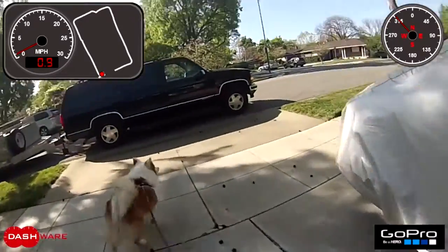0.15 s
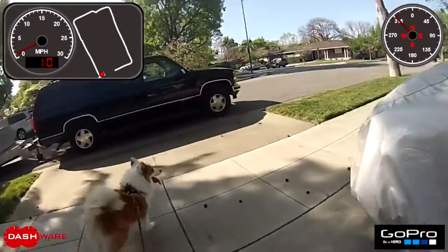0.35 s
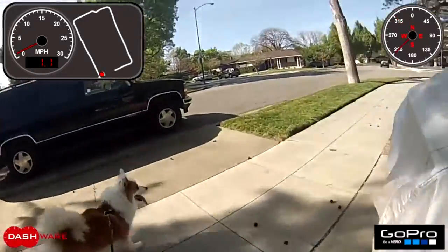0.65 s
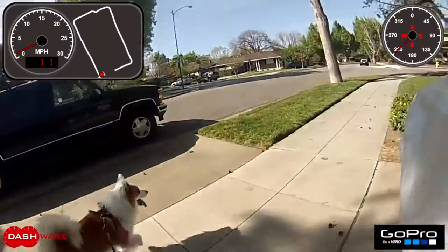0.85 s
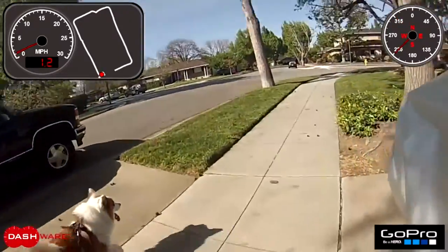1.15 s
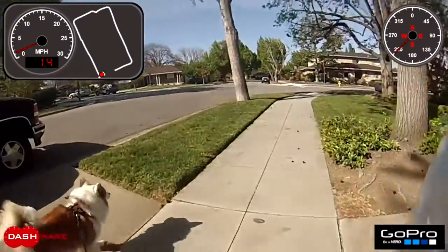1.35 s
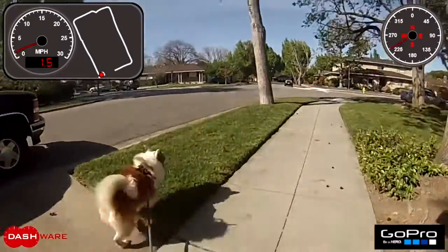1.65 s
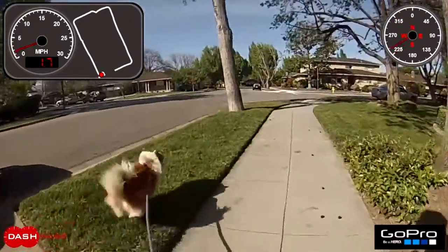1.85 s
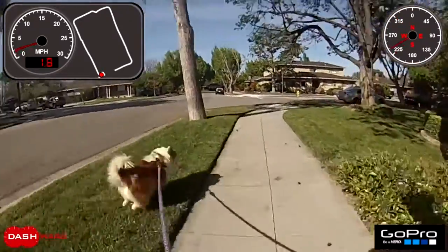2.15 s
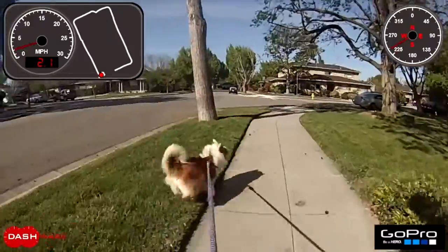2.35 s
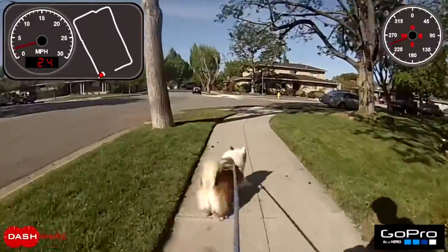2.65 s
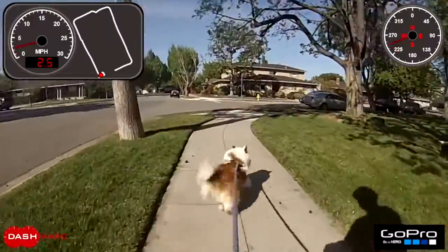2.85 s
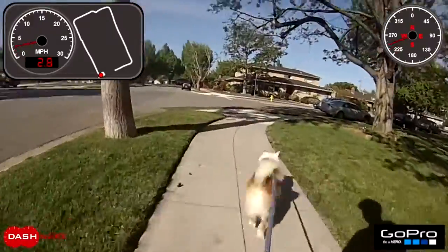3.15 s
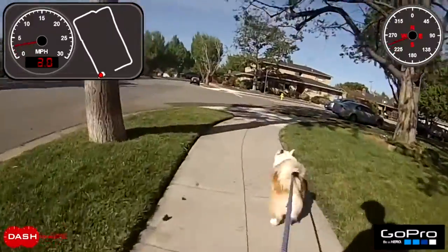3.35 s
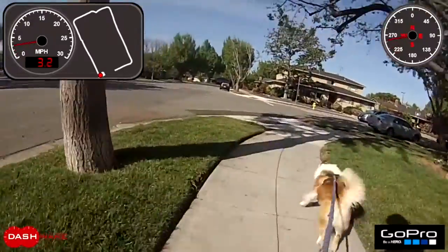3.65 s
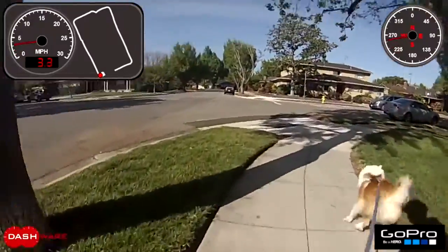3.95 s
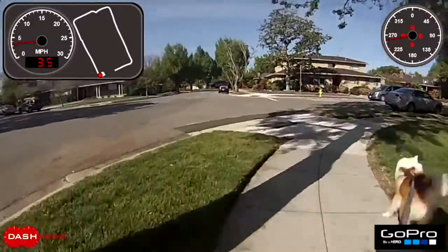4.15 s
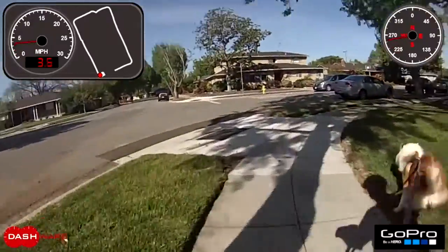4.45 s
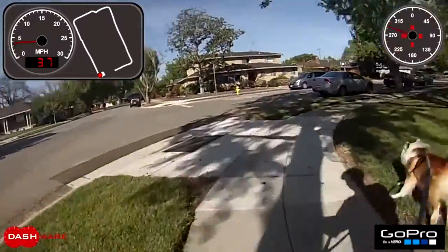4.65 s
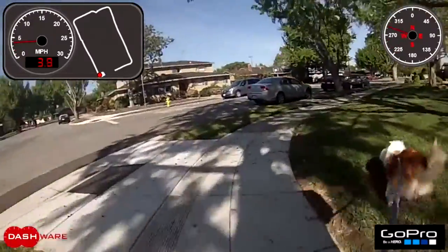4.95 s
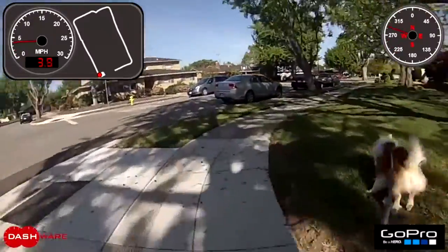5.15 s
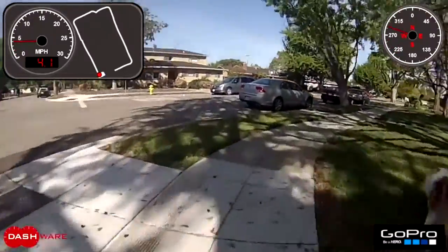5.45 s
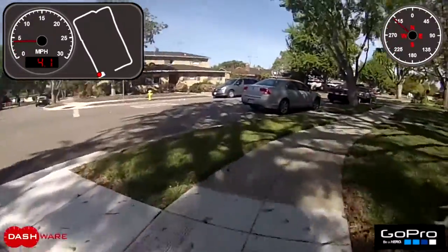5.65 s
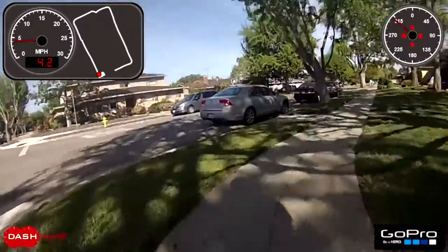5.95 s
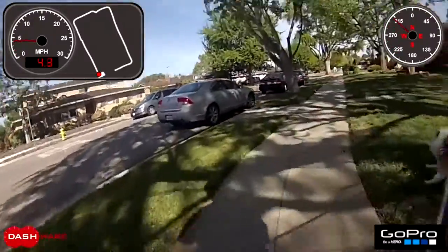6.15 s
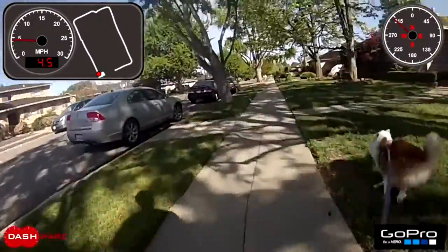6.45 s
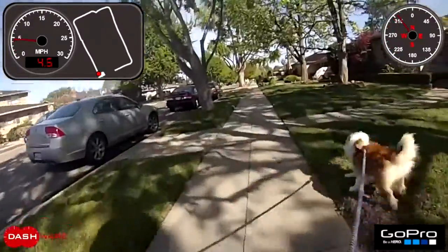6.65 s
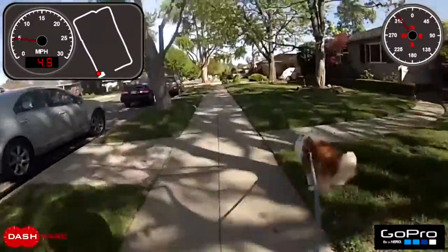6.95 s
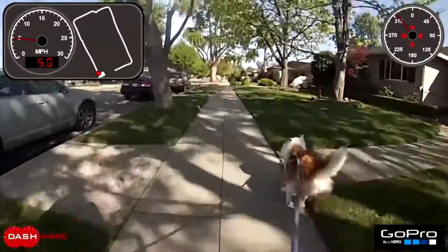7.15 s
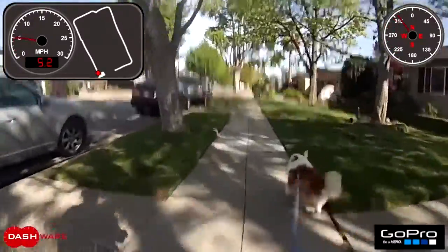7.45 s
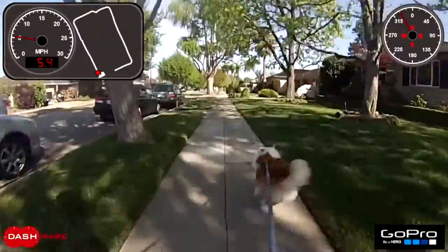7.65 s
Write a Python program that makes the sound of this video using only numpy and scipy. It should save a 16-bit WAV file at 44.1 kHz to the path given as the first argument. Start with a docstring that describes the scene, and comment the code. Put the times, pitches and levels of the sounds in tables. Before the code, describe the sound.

A continuous low boom and dull scraping hiss from scooter wheels on pavement, picked up very close through the vibrating frame. Several blunt thumps strike every second, each with plastic clicks or rattles from loose parts, and the rumble briefly drops after many of them. Fine grit ticks faintly. In the second half knocks crowd together and sound harder and snappier. Muffled, dry, with no room echo.

```python
"""Hard scooter wheels on a concrete sidewalk

Small hard wheels roll over slabs, heard by a microphone fixed to the frame in a closed housing. Random bumps
ring the resonant mount near 75 Hz; shaped swings make the jolts, and the roll dips and creeps back. Noise
bursts and damped modes make loose parts click and ring, grit tick and a small metal part chatter. The housing
muffles the treble, which ends steeply near 15.8 kHz, and the hardest jolts flatten at full scale."""
import sys
import numpy as np
from scipy import signal
from scipy.fft import rfft, irfft, next_fast_len
from scipy.io import wavfile
from scipy.ndimage import uniform_filter1d, map_coordinates

SR = 44100
rng = np.random.default_rng(int(sys.argv[2]) if len(sys.argv) > 2 else 0)


def boost(x):
    """Linear amplitude factor 10**(x/20) for a level x in decibels (scalar or array-like)."""
    u = np.asarray(x, float) / 20
    return 10 ** u


def inscribe(sig):
    """Save sig as 16-bit PCM at rate SR to the path in sys.argv[1].

    A 1-D sig is mono; a 2-D sig holds one channel per row.
    Samples are clipped to [-1, 1] before scaling.
    """
    pcm = np.round(np.clip(np.atleast_2d(sig).T, -1, 1) * 32767)
    wavfile.write(sys.argv[1], SR, pcm.astype(np.int16))


N = 343980  # samples, 7.8 s

# Spectra as relative level per Hz; response() scales each to unit energy.
# the housing, as rolling noise and blows reach the microphone: frequency_hz, level_db
HOUSING_COLOUR = [(300, -12.5), (600, -8.5), (800, -12), (960, -19.5), (1090, -5.5), (1290, -1.5),
                  (1480, -12), (1900, -21), (2600, -41), (5000, -120)]
# the upper ring of the shell: frequency_hz, level_db
SHELL_COLOUR = [(900, -60.5), (1500, 4), (1900, 0), (2400, -4), (2750, -18.5), (3300, -25), (5000, -38),
                (9000, -120)]
# thin treble that passes the housing: frequency_hz, level_db
TREBLE_COLOUR = [(1800, -80), (2800, 1.5), (3400, -2), (4100, -1.5), (5500, -6), (7500, -11), (9700, -18.5),
                 (11100, -18.5), (12600, -23.5), (15500, -26), (17000, -69.5), (20000, -120)]
# the ring of a small metal part: frequency_hz, level_db
METAL_COLOUR = [(2500, -36.5), (4200, 8), (4650, -4.5), (5050, 2), (6500, -8.5), (7500, -6.5),
                (8200, -13.5), (9100, -7.5), (10000, -23.5), (11300, -9), (12500, -16.5), (16000, -51)]
# modes that small contacts ring in the case, one at a time: pitch_hz, level_db
CASE_RESONANCES = [(1150, 0.5), (1290, 1.5), (1600, -7.5), (1900, -6), (2200, -11), (2450, -11)]
# modes that small contacts ring in the metal, one at a time: pitch_hz, level_db
METAL_RESONANCES = [(4200, -2), (5050, 1), (5700, -3), (7400, -12), (9100, -10), (11300, -13.5)]
PING_CYCLES = 36  # cycles in which a ringing part fades by 60 dB


def steady(x, span):
    """Level normalization: division by the moving rms over span seconds, with a small floor."""
    power = uniform_filter1d(x ** 2, int(span * SR))
    return x / np.sqrt(np.abs(power) + 0.0009 * np.mean(x ** 2))


def wobble(rate):
    """Band-limited fluctuation: a smooth curve through random knots, rate a second."""
    knots = rng.standard_normal(int(N * rate / SR) + 4)
    return map_coordinates(knots, [np.arange(N) * rate / SR])


def response(points, size=4096):
    """Minimum phase: the folded cepstrum of a spectrum gives its causal impulse response, of energy 1."""
    f, db = np.transpose(points)
    log_bins = np.log(np.fft.rfftfreq(size, 1 / SR) + 1)
    gain = boost(np.interp(log_bins, np.log(f + 1), db))
    cepstrum = irfft(np.log(gain + 1e-6))
    cepstrum[1:size // 2] *= 2
    cepstrum[size // 2 + 1:] = 0
    h = irfft(np.exp(rfft(cepstrum)))
    return h / np.linalg.norm(h)


def through(x, points):
    """Linear filtering: convolution with the causal response colours the source."""
    return signal.fftconvolve(x, response(points))[:N]


def grit(rate, spread_db):
    """Shot noise: random impulses, rate a second on average, a few much larger than the rest."""
    chance = rng.random(N)
    size = rng.exponential(1, N)
    sign = rng.standard_normal(N)
    return (chance < rate / SR) * sign * boost(spread_db * np.minimum(size, 5.5))


def patchy(x, depth_db):
    """Spectral variation: random gain in patches of time and pitch gives every contact its own colour."""
    z = signal.stft(x, nperseg=128)[2]
    field = uniform_filter1d(rng.standard_normal(z.shape), size=7, axis=0)
    field = uniform_filter1d(field, size=5, axis=1)
    varied = z * boost(depth_db * field / field.std())
    return signal.istft(varied, nperseg=128)[1][:N]


def bursts(events, colour, tail_db, tail_t60):
    """Transient scattering: ragged noise builds up, peaks and decays, with a faint tail on both sides."""
    lead = SR // 30
    out = np.zeros(N + SR)
    t = (np.arange(SR // 8) - lead) / SR
    noise = boost(2.5 * wobble(500)) * rng.standard_normal(N)
    ragged = steady(through(patchy(noise, depth_db=5.5), colour), span=.006)
    for s, db, t60 in events:
        span = np.where(t < 0, -t / 0.73, t)  # the build-up is shorter than the decay
        fade = boost(-60 * span / np.clip(t60, .006, .09))
        fade += boost(tail_db - 60 * span / tail_t60)
        out[round(s * SR) - lead:][:len(t)] += boost(db) * fade
    return out[:N] * ragged


def rings(s, db, modes):
    """Modal excitation: each contact rings one damped mode picked by chance, a little off pitch."""
    detune = .04  # greatest shift, as a share of the pitch
    pick, shift, size = rng.random((len(s), 3)).T
    hz, mode_db = np.array(modes)[(pick * len(modes)).astype(int)].T[:, :, None]
    shifted_hz = hz * (1 + detune * (2 * shift[:, None] - 1))
    turns = shifted_hz * np.arange(SR // 30) / SR
    level_db = (db + 5 * size)[:, None] + mode_db
    envelope = boost(level_db - 60 * turns / PING_CYCLES) * turns / (3 + turns)
    tones = envelope * np.sin(2 * np.pi * turns)
    at = (s * SR).astype(int)[:, None] + np.arange(SR // 30)
    return np.bincount(at.ravel(), tones.ravel(), N + SR)[:N]


def scattered(modes, count, spread_db):
    """Random excitation of modes: contacts at chance moments, a few much larger than the rest; rms 1."""
    s, size = rng.random((count, 2)).T
    x = rings(s * N / SR, -spread_db * np.log(size + .01), modes)
    return x / x.std()


def ticks():
    """Impact excitation: each grain flung against the metal part is a brief burst in its colour."""
    # single grains of grit: peak_s, level_db
    grains = [(0.406, -57), (.656, -55.5), (1.248, -51), (1.87, -55.5), (2.094, -57), (2.369, -54),
              (2.559, -54), (2.601, -54.5), (2.667, -51), (3.198, -55), (3.397, -55), (3.482, -54),
              (3.637, -59), (3.723, -54.5), (3.808, -55.5), (4.976, -59.5), (5.049, -56.5), (5.888, -60),
              (6.148, -54), (6.419, -55), (6.572, -60), (6.583, -59), (6.676, -53), (6.971, -57),
              (7.198, -53), (7.681, -51)]
    t60_s = 0.02
    return bursts([(s, db, t60_s) for s, db in grains], METAL_COLOUR, tail_db=-17.5, tail_t60=0.055)


def chatter():
    """Repeated impact: dense random contacts ring the small metal part for a moment."""
    # spells of chatter: start_s, length_s, level_db
    spells = [(3.535, 0.028, -61), (4.58, 0.079, -62.5), (6.022, 0.032, -63), (6.332, 0.054, -71),
              (7.098, 0.046, -52), (7.16, 0.093, -58.5)]
    t = np.arange(N) / SR
    gate = np.zeros(N)
    for s, length, db in spells:
        corners = [s - .004, s, s + length, s + length + 0.012]
        gate += boost(db) * np.interp(t, corners, [0.0045, 0.88, 0.64, 0.024])
    flutter = boost(4.6 * wobble(90))
    return gate * flutter * steady(through(grit(2500, spread_db=4.0), METAL_COLOUR), span=0.033)


def pings():
    """Free vibration: a hard knock rings one part as a clear, exponentially damped tone."""
    # ringing parts: start_s, pitch_hz, level_db
    tones = [(0.2188, 1280, -9), (5.8223, 2240, -8), (5.8237, 4700, -17.5), (6.368, 4200, -30),
             (6.956, 4130, -19), (7.125, 2400, -31)]
    out = np.zeros(N + SR)
    t = np.arange(SR // 20) / SR
    for s, hz, db in tones:
        turns = t * hz
        envelope = boost(db - 60 * turns / PING_CYCLES) * turns / (1 + turns)
        out[round(s * SR):][:len(t)] += envelope * np.sin(2 * np.pi * turns)
    return out[:N]


def clicks():
    """Impact radiation: loose parts strike and ring housing and shell, and treble leaks through."""
    # strikes: peak_s, housing_db, shell_db, treble_db, t60_s (bursts() holds it to 0.006-0.09)
    strikes = [(0.034, -37, -31, -43, 0.017), (0.2254, -38, -34.5, -52.5, 0.046),
               (0.293, -27, -52, -75, 0.011), (0.3416, -33.5, -33, -43.5, 0.032),
               (0.4608, -30.5, -45, -43.5, 0.055), (0.484, -43, -34.5, -69, 0.1),
               (0.5212, -26, -37, -59, 0.027), (0.6842, -36.5, -49, -52.5, 0.064),
               (0.8401, -28, -40, -41.5, 0.024), (0.865, -43, -49, -63, 0.046),
               (1.052, -16, -38, -31.5, 0.012), (1.065, -50, -46, -58, 0.02), (1.086, -46, -51, -70, 0.016),
               (1.19, -40, -56, -58, 0.017), (1.2068, -28, -38, -66, 0.026),
               (1.2317, -27.5, -43, -61, 0.03), (1.4541, -14.5, -17.5, -38.5, 0.018),
               (1.6175, -25.5, -37, -65, 0.019), (1.63, -27, -46, -49.5, 0.036),
               (1.6797, -11, -21, -39, 0.014), (1.9163, -20.5, -26, -54, 0.04),
               (1.9578, -19.5, -25, -58, 0.022), (1.966, -34, -46, -65, 0.006),
               (1.9937, -26, -30.5, -45, 0.022), (2.0014, -19, -23.5, -57, 0.023),
               (2.065, -32.5, -37.5, -48.5, 0.062), (2.3038, -29, -38, -52, 0.019),
               (2.378, -40.5, -47, -51.5, 0.044), (2.5326, -38, -34, -57, 0.02),
               (2.617, -27.5, -30, -66, 0.023), (2.6518, -30, -43, -46, 0.022),
               (2.8769, -37, -49, -40.5, 0.0053), (2.914, -43, -46, -49.5, 0.054),
               (3.0916, -20.5, -55, -76, 0.05), (3.1275, -46, -43, -43.5, 0.0093),
               (3.183, -32, -47, -43, 0.028), (3.461, -36, -45, -50, 0.033), (3.546, -36, -44, -55, 0.06),
               (3.5574, -26, -33.5, -50, 0.04), (3.661, -41, -50, -52, 0.033),
               (3.7038, -35, -41.5, -46, 0.012), (3.946, -39.5, -40.5, -46.5, 0.04),
               (4.1711, -19, -26, -37, 0.0097), (4.183, -29.5, -58, -46.5, 0.014),
               (4.288, -31, -62, -59, 0.022), (4.3587, -30, -41.5, -48.5, 0.019),
               (4.5966, -27, -60, -75, 0.052), (4.638, -26, -34, -42, 0.0066),
               (4.8186, -29.5, -52, -53.5, 0.11), (4.8776, -28.5, -57, -48, 0.035),
               (5.117, -51, -34.5, -45, 0.03), (5.2754, -19.5, -22, -38.5, 0.0065),
               (5.4528, -27.5, -34, -45, 0.017), (5.5043, -24, -13.5, -26, 0.0052),
               (5.662, -30, -48, -73, 0.02), (5.679, -25, -53, -47, 0.025), (5.8018, -32, -50, -56, 0.072),
               (5.828, -16, -36, -26, 0.0026), (5.955, -30.5, -56, -81, 0.026),
               (5.989, -12.5, -16.5, -35.5, 0.0085), (6.1935, -27.5, -53, -54, 0.021),
               (6.2753, -25, -60, -62, 0.0094), (6.301, -26, -53, -43.5, 0.018),
               (6.3344, -26, -29, -45.5, 0.02), (6.3673, -30, -39, -52, 0.025),
               (6.4883, -41, -29, -61, 0.011), (6.7858, -47, -36, -49, 0.023),
               (6.7987, -19, -65, -46, 0.0086), (6.9134, -54, -39, -54, 0.022),
               (6.955, -15, -16, -29.5, 0.0028), (7.1032, -33, -33.5, -58, 0.067),
               (7.1224, -12, -11, -32, 0.0099), (7.175, -59, -34, -49, 0.024),
               (7.1866, -31.5, -40, -52, 0.034), (7.2412, -50, -36, -58, 0.007),
               (7.2561, -34, -31.5, -49, 0.014), (7.3411, -27, -58, -46.5, 0.013),
               (7.5343, -43, -28.5, -44, 0.022), (7.5432, -45, -28, -37, 0.0093),
               (7.698, -30, -38.5, -38.5, 0.0074)]
    clack_db, clink_db = -5, 0.5  # ring of a strike against its body and treble bursts
    s, housing_db, shell_db, treble_db, t60 = np.transpose(strikes)
    low = bursts(zip(s, housing_db, t60), HOUSING_COLOUR, tail_db=-22.0, tail_t60=0.098)
    high = bursts(zip(s, shell_db, t60), SHELL_COLOUR, tail_db=-19.5, tail_t60=0.099)
    thin = bursts(zip(s, treble_db, t60), TREBLE_COLOUR, tail_db=-23, tail_t60=0.065)
    clack = rings(s - .001, housing_db + clack_db, CASE_RESONANCES[:2])
    clack += rings(s, shell_db + clack_db, CASE_RESONANCES[2:])
    clink = rings(s, treble_db + clink_db, METAL_RESONANCES)
    return low + high + thin + clack + clink


def jolts():
    """Impulse response of a sprung mount: one swing between two smaller ones, a sharp edge, then a ring."""
    # wheels meeting joints and stones: peak_s, level_db, pitch_hz, direction (+1 or -1), knock_db
    impacts = [(0.225, -3, 95, 1, -21.5), (0.295, -9, 196, 1, -25), (0.522, -8, 212, -1, -11.5),
               (0.682, -8.5, 217, 1, -18.5), (0.8358, -0.5, 150, 1, -5.5), (1.0503, 4.5, 142.4, 1, -4.5),
               (1.064, -22, 170, -1, 4), (1.4519, -1, 175, 1, -23), (1.628, -8, 105, 1, -36),
               (1.6825, 2, 200, 1, -28), (1.9209, -6, 225, 1, -26), (1.996, -3.5, 204, -1, -26),
               (2.0646, -4.5, 135, 1, -12), (2.307, -2.5, 145, 1, -37), (2.613, -6, 178, 1, -30),
               (2.6355, -6.5, 184, 1, -32), (2.649, -5, 172, 1, -32), (2.8765, -2.5, 163, 1, -26),
               (2.913, -4.5, 145, -1, -15), (3.129, -8, 155, 1, -36), (3.184, -6, 169, -1, -3),
               (3.4, -7.5, 158, -1, -56), (3.4567, -14, 150, 1, -29), (3.66, -4.5, 171, 1, -27.5),
               (3.942, -5.5, 136, -1, -29), (4.1047, -6, 182, 1, -26), (4.1433, -7.5, 170, 1, -38),
               (4.175, -4.5, 148, -1, -26), (4.2859, -10, 176, -1, -4.5), (4.358, -6, 164, -1, -5.5),
               (4.583, -5.5, 169.4, -1, -30), (4.635, -3.5, 189, -1, -17), (4.651, -5, 115, -1, -16),
               (4.8088, -7, 174, -1, -15), (4.82, -8.5, 173, 1, -23), (4.8795, -3.5, 147, -1, -15.5),
               (4.9746, -7, 159, -1, -13), (5.0495, -6, 163, 1, -24), (5.1161, -5, 169, -1, -2),
               (5.279, -4.5, 204, -1, -2.5), (5.4537, -4.5, 170, -1, -2.5), (5.5037, -1.5, 148.7, -1, -6.5),
               (5.675, -4, 185, 1, -4), (5.7972, -6.5, 207, -1, -21), (5.8238, -5, 187, -1, 1.5),
               (5.9886, -5, 166, 1, 4.5), (6.029, -7.5, 148, 1, -7), (6.3053, -3, 136, -1, -7.5),
               (6.781, -6, 146, 1, -4), (6.91, -9.5, 151, -1, -2), (6.9579, -7, 170, -1, 4.5),
               (7.1, -4, 152, -1, -3.5), (7.124, -9.5, 195, 1, 2), (7.341, -4.5, 171, -1, -20),
               (7.5323, -7.5, 162, -1, 0), (7.544, -13, 170, -1, 2), (7.638, -11, 140, -1, -3),
               (7.7, -12.5, 150, -1, 2)]
    up_lead, down_lead = 0.47, 1.05  # swing before an upward, a downward jolt, against the one after
    lead = SR // 100
    out = np.zeros(N + SR)
    t = (np.arange(SR // 5) - lead) / SR
    after = np.clip(t, 0, None)
    ring = -np.sin(2 * np.pi * 72 * after) * boost(-11 - 60 * after / 0.04)
    chances = rng.random((len(impacts), 2))
    for (s, db, hz, way, knock_db), (late, blunt) in zip(impacts, chances):
        stretch = np.where(t < 0, up_lead if way > 0 else down_lead, 1)
        thud = np.cos(2 * np.pi * hz * t) * np.exp(-(t * hz / stretch / 0.64) ** 2)
        # the struck edge: a narrow pulse with an opposite skirt, a little early or late
        edge = np.hypot(t - 0.00098 * (late - .5), .00012) / (0.0004 + .0001 * blunt)
        knock = boost(knock_db) * (1 - 1.37 * edge) * np.exp(-.8 * edge)
        out[round(s * SR) - lead:][:len(t)] += boost(db) * way * (thud + ring + knock)
    return out[:N]


def level_dips(lag_s):
    """Amplitude modulation: the rolling level drops in dB at each dip, creeps back, then returns in full."""
    # dips of the rolling sound: start_s, length_s (stretched to outlast the drop), loss_db
    dips = [(0.845, 0.21, 21.5), (1.071, 0.13, 23.5), (1.252, 0.17, 9.5), (1.459, 0.1, 20),
            (1.687, 0.2, 9.5), (2.072, 0.16, 13), (2.388, 0.075, 10.5), (2.655, 0.15, 9), (2.905, 0.13, 21),
            (3.191, 0.22, 14), (3.46, 0.11, 8), (3.95, 0.085, 11), (4.175, 0.15, 11.5), (4.64, 0.11, 12.5),
            (4.864, 0.21, 12), (5.124, 0.16, 11.5), (5.284, 0.13, 10.5), (5.503, 0.1, 11.5),
            (5.835, 0.21, 7.5), (6.061, 0.043, 13), (6.464, 0.033, 8)]
    drop_s, return_s = 0.055, 0.01  # time to drop, to return in full
    regain = 0.88  # share of the loss (in dB) regained before the full return
    t = np.arange(N) / SR - lag_s
    loss = np.zeros(N)
    for s, length, db in dips:
        end = s + max(length, drop_s + 0.0048)
        loss += np.interp(t, [s, s + drop_s, end, end + return_s], [0, db, db * (1 - regain), 0])
    return -loss


def rolling():
    """Forced vibration by a rough surface: bumps ring the mount, thump the deck and hiss in the housing."""
    # pavement, coarse unevenness as boom and fine grit as hiss: time_s, boom_db, hiss_db
    surface = [(0, -9, -45), (.12, -20, -44), (.5, -14, -39), (.7, -9, -42), (1.0, -17, -46),
               (1.4, -15, -44), (1.8, -15, -44), (2.2, -15, -42), (2.6, -12, -39), (3.1, -14, -41),
               (3.5, -16, -41), (3.85, -12, -43), (4.35, -16, -44), (4.8, -14, -39), (5.15, -12, -41),
               (5.6, -20, -42), (6.0, -16, -40), (6.35, -16, -39), (6.7, -12, -42), (7.05, -15, -41),
               (7.2, -16, -38), (7.35, -16, -43), (7.8, -15, -42)]
    # resonances of the mount, relative to each other: pitch_hz, width_hz, level_db
    mount = [(66.8, 12, 12.5), (73.06, 9.1, 9), (90.8, 10, -0.5)]
    # the thump of the deck, relative level per Hz: frequency_hz, level_db
    bump_colour = [(70, -19), (125, -7.5), (170, 2.5), (230, -5), (300, -3.5), (345, -13), (400, -19.5),
                   (480, -46.5), (750, -53.5), (900, -51), (1500, -120)]
    boom_lag_s = 0.017  # the boom dips later than the other layers
    bumps_under_boom_db, rattle_under_hiss_db = -12, -25.5
    bumps_dip, hiss_dips, rattle_dips = 0.99, 0.73, 0.78  # share of each dip (in dB) the layer follows
    bumps_grow, rattle_grows, shell_grows = 0.11, 0.5, 0.53  # share of the surface's changes each follows
    case_ring_db, metal_ring_db = -1, -9  # ringing contacts against the scrape, the crackle

    s, *columns = np.transpose(surface)
    coarse_db, fine_db = [np.interp(np.arange(N) / SR, s, c) for c in columns]
    coarse_change = coarse_db - coarse_db.mean()
    fine_change = fine_db - fine_db.mean()
    dip_db = level_dips(lag_s=0)
    boom_db = coarse_db + level_dips(boom_lag_s)
    bump_db = bumps_under_boom_db + coarse_db.mean() + bumps_grow * coarse_change + bumps_dip * dip_db
    hiss_db = fine_db + hiss_dips * dip_db
    rattle_db = rattle_under_hiss_db + fine_db.mean() + rattle_grows * fine_change + rattle_dips * dip_db

    # boom: impulses through second-order resonances, limited to the bass
    m = next_fast_len(N + SR // 2)
    f = np.fft.rfftfreq(m, 1 / SR)
    ring = sum(boost(db) * 1j * f * w / (c * c - f * f + 1j * f * w) for c, w, db in mount)
    ring = ring / (1 + (f / 150) ** 3) / (1 + (42 / (f + 1)) ** 3)
    boom = steady(irfft(rfft(grit(300, spread_db=2.0), m) * ring, m)[:N], span=.2)
    bumps = steady(through(grit(260, spread_db=2.5), bump_colour), span=0.11)
    bumps = bumps * boost(2.96 * wobble(14))

    # the wheels press harder at some moments: hiss and rattle swell together
    press = wobble(28)
    scrape = boost(3.0 * wobble(50)) * through(grit(1400, spread_db=2.0), HOUSING_COLOUR)
    # the shell's share of the scrape follows the hiss level of the pavement
    shell_db = -10.5 + shell_grows * fine_change + 3.3 * wobble(55)
    scrape += boost(shell_db) * through(grit(2000, spread_db=2.0), SHELL_COLOUR)
    case_ring = scattered(CASE_RESONANCES, count=3200, spread_db=2.5)
    scrape = scrape / scrape.std() + boost(case_ring_db) * case_ring
    hiss = steady(boost(1.3 * press) * scrape, span=0.27)

    # fine grit crackles most where the frame swings furthest
    swing = 0.11 + np.abs(boom + 0.32 * bumps)
    crackle = through(patchy(grit(2200, spread_db=0.5), depth_db=1.5), TREBLE_COLOUR)
    metal_ring = scattered(METAL_RESONANCES, count=1500, spread_db=6.0)
    crackle = crackle / crackle.std() + boost(metal_ring_db) * metal_ring
    flicker_db = 4.0 * press + 0.78 * wobble(110) + 1.1 * wobble(5.9)
    rattle = steady(swing * boost(flicker_db) * crackle, span=0.93)
    return boost(boom_db) * boom + boost(bump_db) * bumps + boost(hiss_db) * hiss + boost(rattle_db) * rattle


def scene():
    """Superposition: all sources add at one microphone on the frame, over faint white noise."""
    floor = boost(-94) * rng.standard_normal(N)
    small_parts = ticks() + chatter() + pings() + clicks()
    return (floor + small_parts + jolts() + rolling())[None]


def roll_off(x):
    """The treble ends steeply here."""
    return signal.sosfilt(signal.butter(12, 15800, fs=SR, output="sos"), x)


def record(dry):
    """Amplitude saturation: the hardest jolts flatten at full scale, with a fairly sharp knee."""
    hard = 14  # exponent: higher means a sharper knee
    flattened = dry / (1 + np.abs(dry) ** hard) ** (1 / hard)
    return roll_off(flattened)


dry = scene()
out = record(dry)
inscribe(out)
```